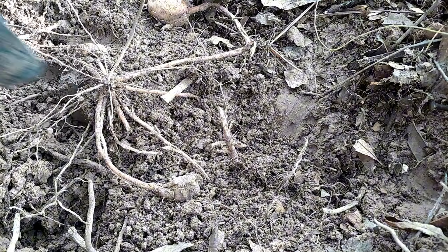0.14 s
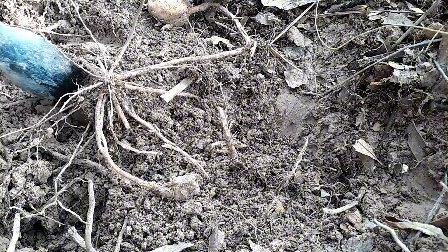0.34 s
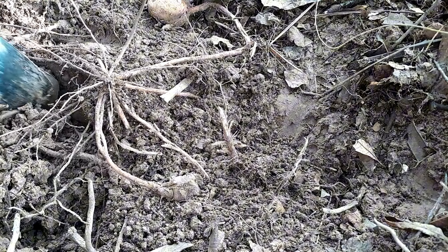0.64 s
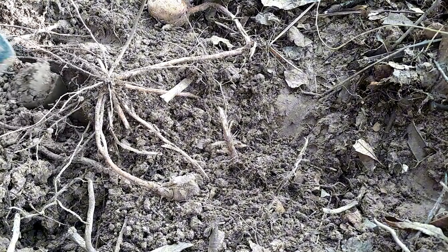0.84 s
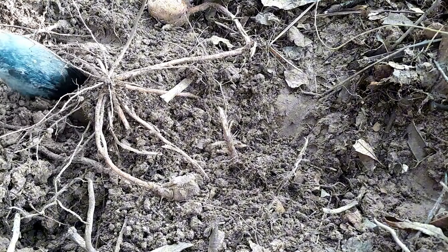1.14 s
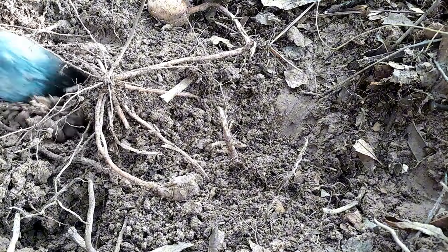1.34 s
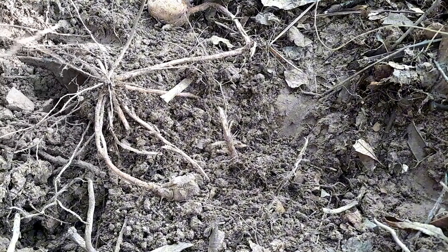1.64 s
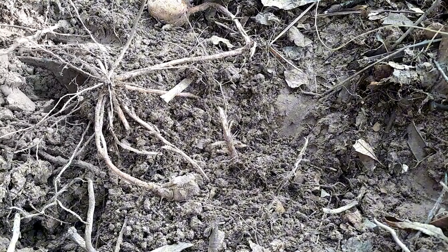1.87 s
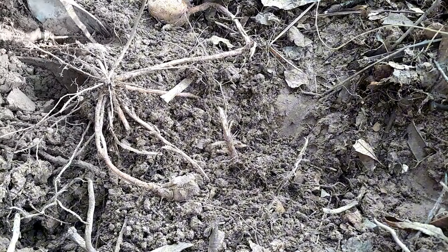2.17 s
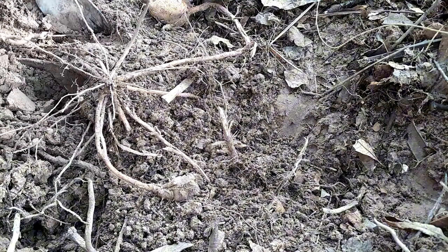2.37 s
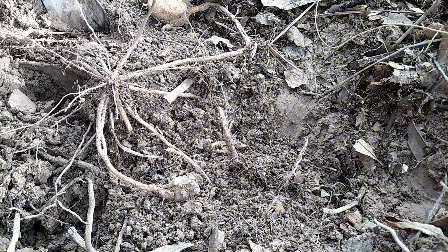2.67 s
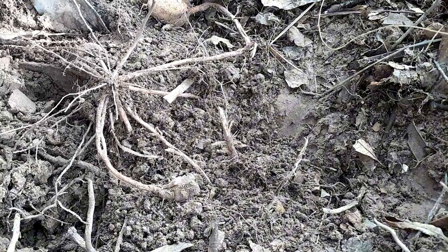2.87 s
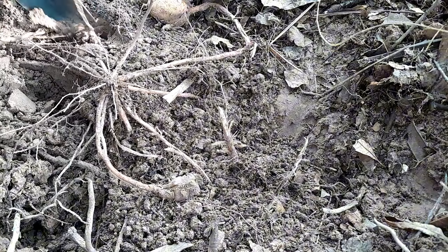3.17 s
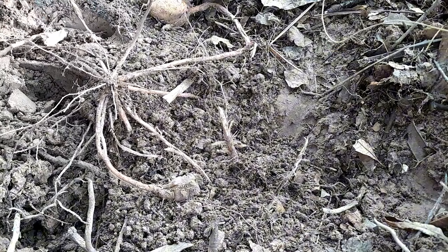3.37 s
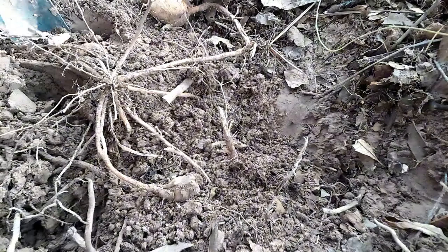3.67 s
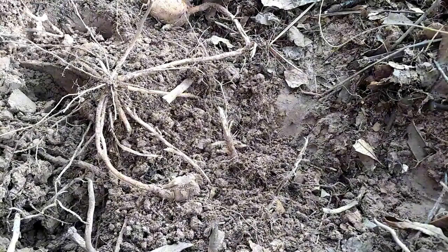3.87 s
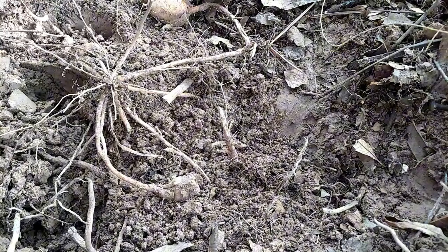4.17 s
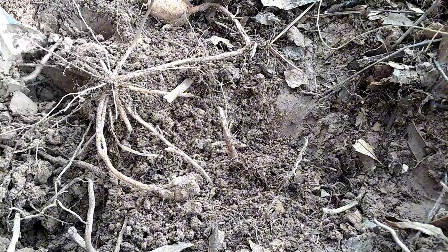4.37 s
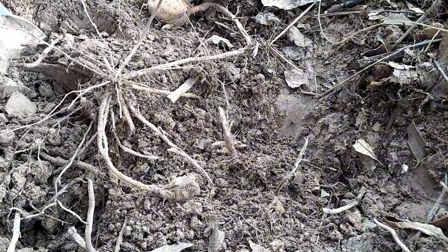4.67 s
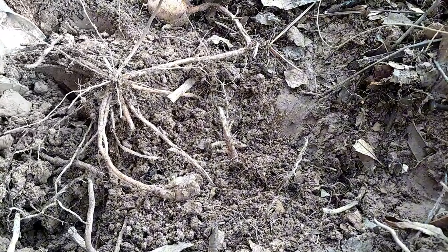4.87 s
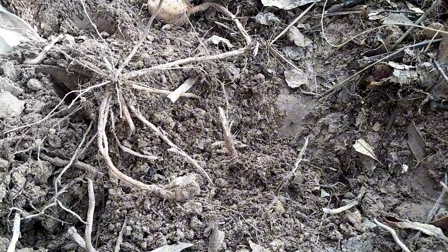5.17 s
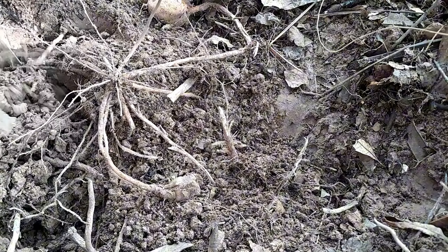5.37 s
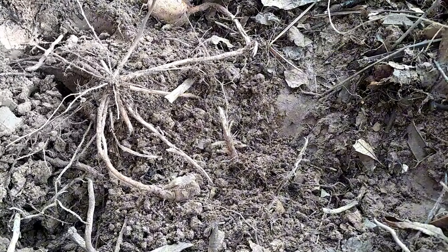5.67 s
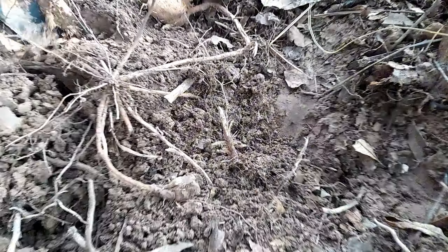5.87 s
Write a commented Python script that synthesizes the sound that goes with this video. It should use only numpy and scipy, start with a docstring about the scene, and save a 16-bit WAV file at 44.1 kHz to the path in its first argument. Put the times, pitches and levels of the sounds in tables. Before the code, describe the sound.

Close by on the left, a small digging blade crunches into dry ground three times with short thuds, and clods clink against the metal. The heaviest jab follows, then another, and soil crumbles and tumbles for a while before one last stroke. Small crumbs and twigs tick throughout. The outdoor background is quiet, with a far, unsteady motor-like hum, a soft rumble and a slight hiss of leaves and insects.

```python
"""Digging in dry, crumbly soil outdoors, close to a pair of microphones and to their left.
From the start a distant engine-like hum wavers over low rumble and a faint hiss of insects and leaves.
A hand tool jabs in at 0.2, 1 and 2.1 s, each time grinding through grit and stopping with a thud; between
jabs soil slides and crumbs tick. Clods knock on the blade near 2.5 s. The heaviest jab lands at 3.6 s,
another at 4.3 s; more soil and clods tumble around 5 s, and the last jab comes at 5.8 s."""
import sys
import numpy as np
from scipy import signal
from scipy.fft import rfft, irfft
from scipy.io import wavfile

SR = 44100
rng = np.random.default_rng(int(sys.argv[2]) if len(sys.argv) > 2 else 0)


def waveform_to_disk(signal):
    """Save audio, clipped to [-1, 1], as 16-bit WAV at the path in sys.argv[1]."""
    frames = np.transpose(np.atleast_2d(signal))
    scaled = np.clip(frames, -1, 1) * 32767
    samples = np.round(scaled).astype(np.int16)
    wavfile.write(sys.argv[1], SR, samples)


N = 265482
LAG_S = 0.00028   # close sounds reach the left microphone first

# Strokes of the blade, close by on the left; the last three levels are relative to the grit:
# (start [s], rise [s], fall [s], grit [dB], coarse crumbs [dB], dust [dB], lumps [dB])
JAB_STROKES = [(0.22, 0.028, 0.04, -31.5, -8, 8, -6), (0.973, 0.053, 0.049, -37, -17, 7.5, -16),
               (1.032, 0.0011, 0.023, -24, 5.5, -0.5, -4), (2.08, 0.023, 0.046, -30, -1, 5, 0),
               (3.598, 0.014, 0.0029, -19.5, -4, 5, 1), (3.613, .001, 0.042, -35, -2, -1.5, -1),
               (4.247, 0.017, 0.064, -29.5, 1, 4, 2), (5.835, .008, 0.008, -20, -8, 6, 0),
               (5.845, 0.0024, 0.057, -35.5, -5, -0.5, -6)]
def jabs():
    """The blade judders as it grinds in. Returns the levels of lumps, coarse crumbs, grit and dust."""
    t, levels = np.arange(N) / SR, np.zeros((4, N))
    judder = amp(1.8 * drift(120))
    for start, rise, fall, grit_db, coarse_db, dust_db, lumps_db in JAB_STROKES:
        push = np.interp(t, start + np.cumsum([0, rise, fall]), [0, 1, 0]) ** 1.54
        levels += push * judder * amp(grit_db + np.array([[lumps_db], [coarse_db], [0], [dust_db]]))
    return levels


# Loose soil sliding round the tool; the last two levels are relative to the grit:
# (start [s], rise [s], hold [s], fall [s], grit [dB], coarse crumbs [dB], dust [dB])
SOIL_SLIDES = [(-0.02, 0.015, .11, .04, -45.5, -17, -2), (0.274, 0.016, 0.012, 0.065, -55, 2, 2),
               (0.335, .22, 0.15, 0.088, -48, -14.5, -0.5), (0.133, 0.022, 0.21, .05, -60.5, -7, 4),
               (1.047, 0.04, 0.078, 0.11, -52, -4, 3), (1.229, 0.0056, .005, 0.11, -45.5, -10, -6.5),
               (1.254, 0.13, 0.092, .08, -43, -9, 0), (1.467, 0.021, 0.21, 0.22, -51, -17, 0.5),
               (1.686, 0.075, 0.017, 0.047, -46.5, -23, 1), (1.799, 0.041, 0.54, 0.077, -65, -12.5, 4),
               (2.137, .01, 0.043, .12, -54, -4, -1), (2.252, 0.074, 0.011, 0.089, -49.5, -7.5, 1.5),
               (2.394, 0.11, 0.098, 0.068, -41.5, -3, 1.5), (2.594, 0.045, 0.11, 0.16, -44.5, 3, 0),
               (2.792, 0.026, .1, 0.33, -48.5, -6, 0), (3.083, 0.056, .04, .07, -41, -22, 4),
               (3.164, 0.0036, 0.0018, 0.066, -40, -3, -11), (3.101, 0.12, 0.29, 0.12, -54.5, -2, 4.5),
               (3.365, 0.059, 0.019, 0.037, -43, -5, -14), (3.626, 0.036, 0.029, 0.092, -52, -11, -3),
               (3.699, 0.079, 0.51, 0.18, -59, -16, -6), (3.802, 0.028, 0.0071, 0.034, -44, -5.5, 5.5),
               (3.871, .09, .01, 0.035, -53, -11, -14), (4.018, 0.011, .002, 0.037, -51.5, -2, 4.5),
               (4.052, 0.048, 0.0088, .05, -55.5, -1.5, -5), (4.316, 0.029, .005, 0.047, -52.5, -1.5, -6),
               (4.335, 0.46, 0.18, .05, -52.5, 1, 6), (4.818, 0.11, .58, 0.23, -45.5, -3.5, 4.5),
               (4.899, 0.033, 0.008, 0.068, -39, 2.5, -18), (4.949, 0.11, .05, .08, -41.5, 1, 4),
               (5.144, 0.057, 0.21, 0.12, -36.5, -8.5, -0.5), (5.387, 0.063, 0.018, 0.061, -36, -4.5, 4),
               (5.58, 0.033, 0.065, 0.2, -48.5, 1, -1.5), (5.855, .11, 0.018, 0.048, -49.5, -0.5, 0.5)]
def slides():
    """Soil slips in uneven clumps; powers add. Returns the levels of the same four sizes."""
    t, power = np.arange(N) / SR, np.zeros((3, N))
    for start, rise, hold, fall, grit_db, coarse_db, dust_db in SOIL_SLIDES:
        flow = np.interp(t, start + np.cumsum([0, rise, hold, fall]), [0, 1, 1, 0]) ** 1.19
        power += (flow * amp(grit_db + np.array([[coarse_db], [0], [dust_db]]))) ** 2
    coarse, grit, dust = np.sqrt(power)
    lumps = amp(-12.5) * coarse
    clumps_db = 0.84 * drift(20) + 1.38 * drift(60)
    flicker_db = [1.7 * drift(21), 4.27 * drift(15.6), 1.1 * drift(23), 2.03 * drift(27)]
    return amp(clumps_db + flicker_db) * [lumps, coarse, grit, dust]


# Crackle of dry earth at close range: (frequency [Hz], relative level [dB])
GRAIN_SPECTRUM = [(150, -9), (260, 1), (650, 4), (1400, 4), (2500, 5), (5000, 6.5), (9000, 2), (13000, 4.5),
                  (16000, -2.5), (20000, -45)]
def grains(per_s, spread_db, scatter_hz=2140):
    """Both microphones hear the same grains, the right later; above scatter_hz each also has its own."""
    strengths = amp(spread_db * np.minimum(rng.exponential(1, (3, N)), 5)) * rng.choice([-1, 1], (3, N))
    clicks = strengths * (rng.random((3, N)) < per_s / SR)
    shared = np.array([clicks[0], np.roll(clicks[0], round(LAG_S * SR))])
    own = highpass(clicks[1:], scatter_hz)
    return coloured(shared + amp(1.5) * own, GRAIN_SPECTRUM)


# Modes of the steel blade: (frequency [Hz], level [dB], t60 [s])
BLADE_MODES = [(960, 2, .022), (1370, -3, .012), (1740, -3, .012), (2300, -3, .010), (2800, -5, .010),
               (3500, -11, .007)]
def soil():
    """Earth breaks in four sizes, lumps to dust; grit rubbing the steel keeps its upper modes singing."""
    levels = slides() + jabs()
    sizes = by_size(grains(per_s=6000, spread_db=3.5), edges_hz=[350, 1000, 3600, 11000])
    earth = sum(level * size for level, size in zip(levels, sizes))
    grit_level, grit = levels[2], sizes[2]
    singing = sum(amp(db + 3.5 * drift(9)) * rms_one(ring(grit, hz, t60))
                  for hz, db, t60 in BLADE_MODES[2:])
    return earth + amp(-15) * grit_level * singing


# The tool stopping in the ground near the microphones:
# (time [s], peak [dB], first pitch [Hz], last pitch [Hz], t60 [s])
GROUND_THUDS = [(0.271, -15, 220, 146, 0.02), (.2820, -22.5, 91, 69, 0.027), (1.036, -10, 135, 128, 0.023),
                (1.045, -9, 213, 166.5, 0.031), (2.0940, -13, 145, 133, 0.029),
                (2.1052, -7.5, 267, 170, 0.013), (2.1320, -11, 228, 143, 0.019),
                (3.6048, -2.5, 226.2, 133, 0.03), (3.6195, -2, 131.3, 66, 0.043),
                (4.2600, -24, 162, 116, 0.14), (4.2951, -6.5, 223, 129, 0.023),
                (4.3080, -22, 80, 60, 0.047), (5.838, -20.5, 152, 142, 0.016),
                (5.848, -4, 223.8, 120, 0.025), (5.858, -8, 76, 58.4, 0.035)]
def thuds(swell_s=0.003, sink_s=0.005):
    """The ground swings, its pitch sinking as the slow waves arrive; loose earth damps it ever faster."""
    out, t = np.zeros((2, N)), np.arange(SR // 5) / SR
    for s, peak_db, first_hz, last_hz, t60 in GROUND_THUDS:
        hz = last_hz + (first_hz - last_hz) * np.exp(-t / sink_s)
        envelope = (1 - np.exp(-t / swell_s)) * amp(-60 * (t / t60) ** 2)
        wave = np.sin(2 * np.pi * np.cumsum(hz) / SR) * envelope / envelope.max()
        add(out, s, amp(peak_db) * microphone_pair(wave, lag_s=0.00015))
    return out


# Clods hitting the blade, close by:
# (time [s], peak [dB], brightness [dB per octave], left over right [dB, held within 6])
CLOD_KNOCKS = [(2.487, -14, -5, -1), (2.522, -4, -2.5, -12.5), (2.544, -25, -12, -9), (2.6, -30, -8, 6),
               (2.61, -11.5, -4, -8.5), (2.623, -19.5, 5, 7), (2.656, -26, 5, -8), (4.817, -12, 5.5, 6),
               (4.821, -15, 7, -13), (5.021, -22, 2, -3), (5.292, -19.5, 7, -9)]
def knocks():
    """Each clod strikes all modes of the blade and crumbles on it; small hard ones favour high modes."""
    out, t = np.zeros((2, N)), np.arange(SR // 10) / SR
    chance_db = rng.normal(0, 0.97, (len(CLOD_KNOCKS), len(BLADE_MODES)))
    rubble = rng.standard_normal((len(CLOD_KNOCKS), len(t)))
    for (s, peak_db, bright_db, pan_db), offsets_db, noise in zip(CLOD_KNOCKS, chance_db, rubble):
        blow = (t == 0) + amp(-19 - 60 * t / 0.014) * noise
        wave = sum(amp(db + offset_db + bright_db * np.log2(hz / 1000)) * ring(blow, hz, t60)
                   for (hz, db, t60), offset_db in zip(BLADE_MODES, offsets_db))
        wave = band(wave, 650, 9000)   # a small blade radiates no bass
        add(out, s, amp(peak_db) * microphone_pair(wave / np.abs(wave).max(), np.clip(pan_db, -6, 6)))
    return out


# Crumbs and twigs ticking on both sides of the microphones:
# (time [s], peak [dB], pitch [Hz], left over right [dB, held within 9], t60 [s])
CRUMB_TICKS = [(0.0668, -23.5, 2570, -1, 0.039), (0.108, -28, 6230, 10, 0.022),
               (0.305, -27, 7700, 10, 0.032), (0.337, -12.5, 4460, 10.5, 0.026),
               (0.4227, -34, 2670, 10, 0.031), (0.9947, -18, 9300, 12, 0.066),
               (1.1013, -22, 9730, 11, 0.02), (1.2419, -25, 3580, 10, 0.0092),
               (1.263, -21.5, 8200, 8, 0.014), (1.4265, -26.5, 3006, 8, 0.018),
               (2.088, -9, 8320, 14, 0.068), (2.1567, -26.5, 2770, 2, 0.037),
               (2.3062, -25, 8600, 10, 0.021), (2.4648, -24.5, 4820, 1, 0.08), (2.58, -14, 6450, -5, 0.022),
               (2.7325, -13, 3830, -4, 0.052), (2.7775, -29, 2280, -16, 0.024),
               (2.8362, -21.5, 6380, 0, 0.081), (2.9138, -19, 9210, -1, 0.026),
               (2.9561, -36, 3092, -10, 0.024), (2.988, -28, 3720, -12, 0.025),
               (3.025, -29, 2730, -13, 0.066), (3.169, -20, 1710, -9, 0.022),
               (3.3283, -25, 1870, 4.5, 0.024), (3.4107, -28, 1830, 3, 0.025), (3.73, -34, 3165, -5, 0.03),
               (3.8193, -29, 4800, -5, 0.06), (3.9557, -27, 8080, 0.5, 0.023),
               (4.0268, -21, 2850, 0, 0.019), (4.1045, -24.5, 2654, 10, 0.026),
               (4.345, -34, 3880, 3, 0.029), (4.5455, -29, 1226, -2, 0.014), (4.928, -8.5, 7270, 8, 0.024),
               (5.0428, -15, 11900, 10, 0.024), (5.1047, -8, 7750, 12, 0.068),
               (5.1367, -18, 4760, -14, 0.037), (5.2045, -12.5, 4430, 4, 0.027),
               (5.6829, -28.5, 1400, -14.5, 0.068), (5.7428, -32, 2983, -10, 0.028),
               (5.8226, -7.5, 9470, 16, 0.061), (5.9787, -25, 4630, 10, 0.015)]
def ticks():
    """A snap and a short spray of fragments, in a broad band round the crumb's pitch."""
    out, t = np.zeros((2, N)), np.arange(SR // 12) / SR
    snap = 10.8 * (t == 0)
    sprays = rng.standard_normal((len(CRUMB_TICKS), len(t)))
    for (s, peak_db, hz, pan_db, t60), spray in zip(CRUMB_TICKS, sprays):
        wave = band(snap + spray * amp(-60 * t / t60), hz / 1.78, hz * 2)
        add(out, s, amp(peak_db) * microphone_pair(wave / np.abs(wave).max(), np.clip(pan_db, -9, 9)))
    return out


# Engine-like hum, far off, alike in both microphones: (time [s], pitch [Hz], tone [dB], octave [dB])
HUM_COURSE = [(0.0, 76.9, -43, -62), (0.35, 76.6, -58, -55.5), (0.48, 75.03, -55, -70),
              (0.62, 75.1, -41, -68.5), (0.9, 76.3, -42, -56), (1.5, 77.3, -41.5, -51.5),
              (1.84, 77.2, -34.5, -52), (1.98, 77.7, -40.5, -54), (2.3, 78.5, -38, -50.5),
              (2.65, 78.9, -33.5, -46), (2.8, 78.8, -44.5, -50.5), (3.22, 78.75, -41.5, -62),
              (3.5, 79.23, -46, -66), (4.04, 79.17, -42, -54.5), (4.5, 88.4, -63, -75),
              (4.9, 88.4, -65, -73), (5.18, 89.25, -39, -65), (5.55, 89.34, -52.5, -59.5),
              (5.85, 85.7, -42.5, -57), (6.02, 89, -45, -58)]
def hum(throb_hz=2.8, throb_db=5, throb_top_s=1.461):
    """A tone and its throbbing octave, both unsteady in pitch and level."""
    hz, tone_db, octave_db = in_time(HUM_COURSE)
    phase = 2 * np.pi * np.cumsum(hz * (1 + 0.012 * drift(4.9))) / SR
    throb = np.cos(2 * np.pi * throb_hz * (np.arange(N) / SR - throb_top_s))
    tone = amp(tone_db + 3 * drift(8)) * np.sin(phase)
    octave = amp(octave_db + throb_db * throb + 3 * drift(5)) * np.sin(2 * phase)
    return tone + octave


# Low rumble all round the spot: (frequency [Hz], relative level [dB])
RUMBLE_SPECTRUM = [(12, -16), (20, -29), (59, 4), (85, -4), (242, -20), (439, -34), (702, -37.5),
                   (783, -32.5), (1100, -43), (1500, -55), (1950, -35), (3300, -120)]
def rumble(level_db=-46):
    """Deep, fluttering noise whose long waves reach both microphones alike."""
    mid, side = coloured(rng.standard_normal((2, N)), RUMBLE_SPECTRUM) * amp(level_db + 2 * drift(13.5))
    return mid + amp(1) * highpass(side, 200) * [[1], [-1]]


# Leaves in the distance: (frequency [Hz], relative level [dB])
LEAF_SPECTRUM = [(500, -21), (1000, -17), (2000, -12), (4000, -7), (7000, -5.5), (11000, -2), (16000, -6),
                 (20000, -24)]
def leaves(level_db=-57):
    """Far leaves blend into a steady hiss, different at each microphone."""
    return amp(level_db) * coloured(rng.standard_normal((2, N)), LEAF_SPECTRUM)


# Insects, faint in the background: (centre [Hz], width [Hz], level [dB])
INSECT_BANDS = [(8460, 860, -59)]
def insects():
    """A narrow, high hiss that slowly swells and fades."""
    out = np.zeros((2, N))
    for hz, width_hz, db in INSECT_BANDS:
        level = amp(db + 5.2 * drift(1.7))
        out += level * rms_one(band(rng.standard_normal((2, N)), hz - width_hz / 2, hz + width_hz / 2))
    return out


def amp(db):
    return 10 ** (np.asarray(db) / 20)


def rms_one(x):
    return x / np.sqrt(np.mean(x ** 2) + 1e-20)


def in_time(rows):
    """Rows of (time [s], values...) become one curve a value."""
    s, *columns = np.transpose(rows)
    return [np.interp(np.arange(N) / SR, s, column) for column in columns]


def drift(rate_hz, steps_per_s=400):
    """Smooth random wander, rms 1."""
    steps = rng.standard_normal(int(N / SR * steps_per_s))
    r = np.exp(-2 * np.pi * rate_hz / steps_per_s)
    slow = signal.lfilter([1], [1, -2 * r, r * r], np.r_[steps, steps])[len(steps):]
    return np.interp(np.linspace(0, len(slow) - 1, N), np.arange(len(slow)), rms_one(slow))


def coloured(x, spectrum):
    """Shape by a spectrum of (frequency [Hz], level [dB]); rms 1."""
    hz, db = np.transpose(spectrum)
    grid = np.maximum(np.arange(N // 2 + 1) * SR / N, 1)
    return rms_one(irfft(rfft(x) * amp(np.interp(np.log(grid), np.log(hz), db)), N))


def by_size(x, edges_hz):
    """Split into overlapping bands, each fullest at its own edge and gone at the next; each of rms 1."""
    bands = np.arange(len(edges_hz))
    place = np.interp(np.log(np.arange(N // 2 + 1) * SR / N + 1), np.log(edges_hz), bands)
    return [rms_one(irfft(rfft(x) * np.cos(np.pi / 2 * np.clip(place - k, -1, 1)), N)) for k in bands]


def band(x, low_hz, high_hz):
    sos = signal.butter(2, [low_hz, min(high_hz, SR / 2.2)], "band", fs=SR, output="sos")
    return signal.sosfilt(sos, x)


def highpass(x, hz, order=1):
    return signal.sosfilt(signal.butter(order, hz, "high", fs=SR, output="sos"), x)


def ring(x, hz, t60):
    """One mode: a unit click sets a sine of height 1 ringing."""
    r, w = amp(-60 / (t60 * SR)), 2 * np.pi * hz / SR
    return signal.lfilter([0, np.sin(w)], [1, -2 * r * np.cos(w), r * r], x)


def microphone_pair(x, pan_db=0, lag_s=LAG_S):
    """The left microphone hears it first, and pan_db louder than the right."""
    samples = np.arange(len(x))
    late = np.interp(samples - lag_s * SR, samples, x, left=0)
    return np.array([x * amp(pan_db / 2), late * amp(-pan_db / 2)])


def add(out, s, sound):
    """Mix a short sound in at time s."""
    at = round(s * SR)
    out[:, at:at + sound.shape[1]] += sound[:, :N - at]


def scene():
    """Close digging in front of a quiet, distant background."""
    return soil() + thuds() + knocks() + ticks() + hum() + rumble() + leaves() + insects()


def record(dry):
    """The microphones lose the deepest bass, peaks stop at full scale, the top is cut."""
    clipped = np.clip(highpass(dry, 38, order=2), -1, 1)
    return signal.sosfilt(signal.ellip(9, 0.3, 65, 15750, fs=SR, output="sos"), clipped)


dry = scene()
out = record(dry)
waveform_to_disk(out)
```